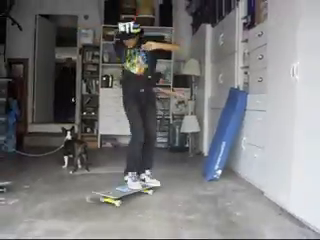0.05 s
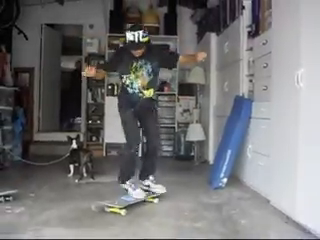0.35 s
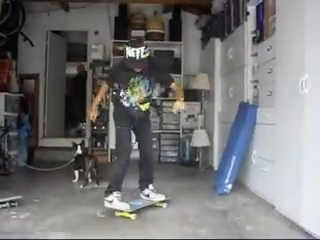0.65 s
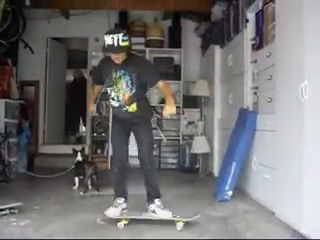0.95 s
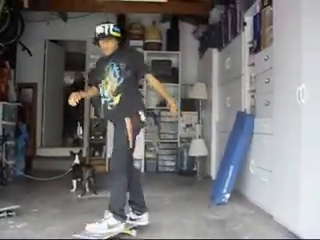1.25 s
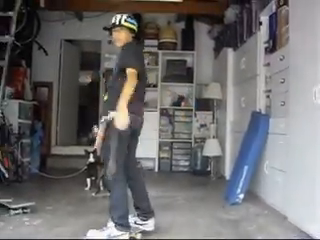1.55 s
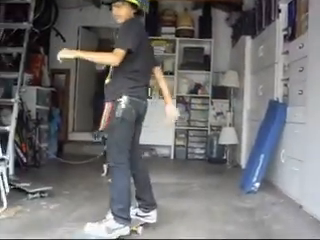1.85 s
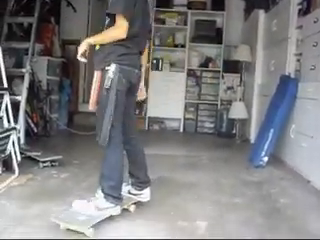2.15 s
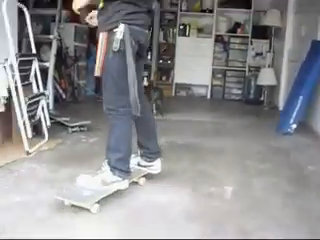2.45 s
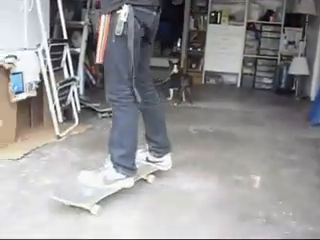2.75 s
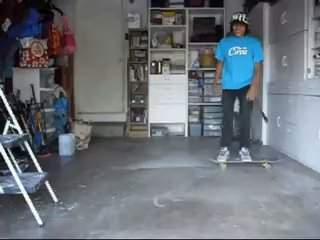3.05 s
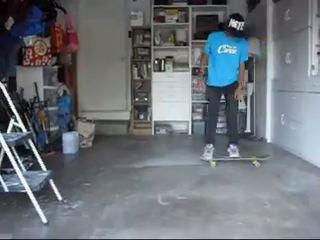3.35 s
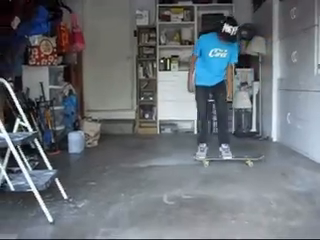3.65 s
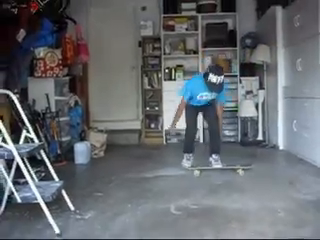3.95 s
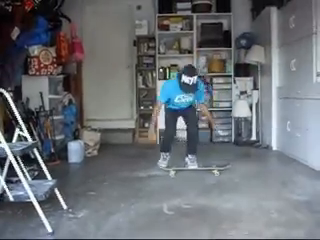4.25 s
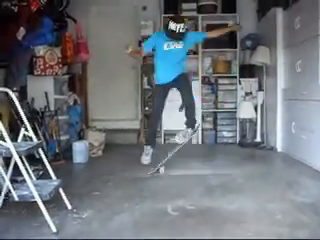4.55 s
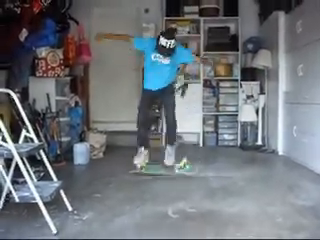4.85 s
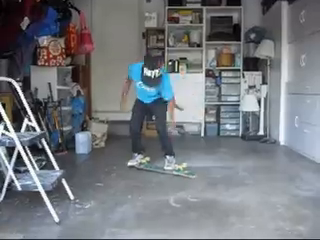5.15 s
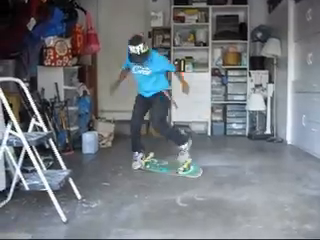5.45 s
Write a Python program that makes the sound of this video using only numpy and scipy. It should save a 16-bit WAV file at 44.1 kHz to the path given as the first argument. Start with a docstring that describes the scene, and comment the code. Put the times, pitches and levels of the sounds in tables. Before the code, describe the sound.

A skateboard lands on a concrete garage floor with a sharp wooden clack, then knocks lightly and rolls over a low rumble. After a brief dead silence, a second board rolls with wheel knocks and shoe scuffs. Its tail snaps and it slams down, overloading the microphone. A rubber sole squeaks as it rolls on, with faint bearing sizzle and metallic tinkles.

```python
"""A skateboard does a flip trick on a concrete garage floor; after a short silence, a second one does.
The tail snaps, the wooden deck rings, is caught and slams down hard enough to overload the microphone.
Wheels roll, knock and crush grit, bearings sizzle and loose axle washers jingle.
Rubber soles scuff on grip tape and squeak as they stick and slip.
Underneath, a low rumble swells with wind, rolling and the air pushed by the landing."""
import sys
import numpy as np
from scipy import signal
from scipy.fft import rfft, irfft, next_fast_len
from scipy.io import wavfile
from scipy.ndimage import uniform_filter1d, map_coordinates

SR = 44100
rng = np.random.default_rng(int(sys.argv[2]) if len(sys.argv) > 2 else 0)


def log_audio(samples):
    """Write samples as a 16-bit WAV file to the path given in sys.argv[1]."""
    # one column per channel
    frames = np.atleast_2d(samples).T
    # limit to full scale, then quantise
    limited = np.clip(frames, -1, 1)
    pcm = np.round(limited * 32767).astype(np.int16)
    wavfile.write(sys.argv[1], SR, pcm)


N = 246959
TIME = np.arange(N) / SR
GAP_START_S, GAP_END_S = 2.745, 3.186  # silence between the two boards


def amp(db):
    """Decibels to gain."""
    return 10 ** (np.asarray(db) / 20)


def unit(x):
    """Scales to rms 1."""
    return x / np.sqrt(np.mean(x ** 2) + 1e-20)


def at_hz(points, hz):
    """Interpolates (frequency [Hz], value) points on a log-frequency axis."""
    f, value = np.transpose(points)
    return np.interp(np.log(hz + 1), np.log(f + 1), value)


def add(mix, start_s, sound):
    """Mixes a sound in at start_s."""
    part = mix[max(0, round(start_s * SR)):][:len(sound)]
    part += sound[:len(part)]


def coloured(x, spectrum):
    """Filters noise by a spectrum, to rms 1."""
    size = next_fast_len(len(x))
    gain = amp(at_hz(spectrum, np.fft.rfftfreq(size, 1 / SR)))
    return unit(irfft(rfft(x, size) * gain, size)[:len(x)])


def wander(per_s):
    """Smooth random curve, rms 1, about per_s changes a second."""
    knots = rng.standard_normal(8192)
    return unit(map_coordinates(knots, [TIME * per_s], order=2, mode="wrap"))


def minimum_phase(gain):
    """Impulse response with this gain that starts at once and rings out."""
    log_gain = np.log(np.maximum(gain, 1e-5))
    mirrored = np.concatenate([log_gain, log_gain[-2:0:-1]])
    return np.fft.ifft(np.exp(np.conj(signal.hilbert(mirrored)))).real


def strokes(rows, rise_s, fall_s):
    """Rise-hold-fall gain for rows of (start [s], length [s], level [dB])."""
    return sum(amp(db) * np.clip(np.minimum((TIME - s) / rise_s, (s + length - TIME) / fall_s), 0, 1)
               for s, length, db in rows)


def gritty(grains_per_s, spread_db):
    """Tiny contacts of random time and size."""
    size = amp(spread_db * np.minimum(rng.exponential(1, N), 5))
    return size * rng.standard_normal(N) * (rng.random(N) < grains_per_s / SR)


# Room decay: (frequency [Hz], t60 [s])
GARAGE_DECAY = [(100, 0.24), (300, 0.19), (550, 0.21), (850, 0.26), (1900, 0.26), (4800, 0.27),
                (9000, 0.26), (15000, 0.24)]
# Floor, wall and shelf reflections: (delay [s], gain [ratio])
REFLECTIONS = [(.0034, 0.15), (.0087, -0.11), (0.0145, 0.027)]


def garage(direct_gain=0.4, build_s=0.0016):
    """Room response from a new spot each call: direct sound, near reflections, dense tail."""
    hz, t, noise = signal.stft(rng.standard_normal(SR // 2), SR, nperseg=256)
    decay = amp(-60 * t / at_hz(GARAGE_DECAY, hz)[:, None])
    tail = signal.istft(noise * decay, SR, nperseg=256)[1]
    tail *= 1 - np.exp(-(np.arange(len(tail)) / SR / build_s) ** 2)
    response = tail / np.linalg.norm(tail)
    response[0] += direct_gain
    for delay_s, gain in REFLECTIONS:
        add(response, delay_s, np.array([gain]))
    return response / np.linalg.norm(response)


def in_garage(x):
    """Puts the room around a sound."""
    return signal.fftconvolve(x, garage())[:N]


# Struck body: (frequency [Hz], level [dB])
KNOCK_SPECTRUM = [(40, -25.5), (130, -18), (240, -7), (500, 0.5), (1000, -2.5), (2000, -2.5), (3500, -8),
                  (5500, -10.5), (8000, -19), (11000, -27.5), (16000, -34)]
# Contact tick: (frequency [Hz], level [dB])
TICK_SPECTRUM = [(1000, -6.5), (3000, -7), (4400, 1), (5800, -11), (7200, -6.5), (10500, -17), (16000, -26)]
# Deck bending under the rider: (frequency [Hz], level [dB], t60 [s])
FLEX_MODES = [(54.6, -15.5, 0.042), (104.2, 1, 0.068), (160.6, 4.5, 0.086), (221, 1, 0.15)]


def knock(modes, force_db, tilt_db_per_oct, thump_db, tick_db, tick_s=0.00069):
    """One impact: a hard contact tick, a low flex thump and the body ringing into the room."""
    hz, t = np.fft.rfftfreq(4096, 1 / SR), np.arange(4096) / SR
    peaks = sum(amp(db) ** 2 / (1 + (2 * (hz - f) / width) ** 2) for f, width, db in modes)
    tilt_db = tilt_db_per_oct * np.log2(np.clip(hz, 300, 9000) / 1500)
    body = amp(at_hz(KNOCK_SPECTRUM, hz) + tilt_db) * np.sqrt(1 + peaks)
    sound = amp(22.5) * signal.fftconvolve(garage(), minimum_phase(unit(body)))
    tick = coloured(rng.standard_normal(len(t)), TICK_SPECTRUM) * np.exp(-t / tick_s)
    thump = sum(amp(db - 60 * t / t60) * np.sin(2 * np.pi * f * rng.uniform(.9, 1.1) * t)
                for f, db, t60 in FLEX_MODES)
    add(sound, 0, amp(20.5 + tick_db) * tick / np.linalg.norm(tick))
    add(sound, 0, amp(23 + thump_db) * thump / np.linalg.norm(thump))
    return amp(force_db) * sound


# Board knocks: (time [s], force [dB], tilt [dB/oct], relative thump [dB], relative tick [dB])
BOARD_HITS = [ (0.000, 5.5, -1, -27, -19), (0.009, 0, 0.5, -30, -12), (0.027, -4, -7, -22, -26),
              (0.051, -15, -0.5, -24, -16), (0.261, -23, 1, -15.5, -16), (0.362, -27.5, -1.5, -20, -20),
              (0.383, -18, -1, -8.5, -35), (0.404, -11, -1.5, -26, -21), (0.421, -15.5, -2.5, -8, -14),
              (0.627, -28.5, -1, -26, -17), (4.402, -31.5, -1.5, 2, -23), (4.518, -34, -14, -8, -20),
              (4.5359, -2.5, 0.5, -18, -11.5), (4.539, -0.5, 0, -17.5, -10.5), (4.834, -10, -1, -11, -19),
              (4.8752, 10, -3, -7.5, -10), (4.887, 12, -4, -12, -14.5), (4.905, 6, -2, 2, -3),
              (4.920, 9.5, -2, -6.5, -4), (4.936, 3.5, 0.5, -6, -7), (5.439, -29, -2.5, -11, -24),
              (5.581, -28, -5, -22, -13)]
# Resonances of each board: (frequency [Hz], width [Hz], peak re knock spectrum [dB])
FIRST_BOARD_MODES = [(257, 54, 5), (356, 84, 3.5), (531.4, 50, 4.5), (807, 19, 4.5), (1007, 110, 4),
                     (1370, 350, 4), (1660, 130, 5.5), (3405, 450, -2.5)]
SECOND_BOARD_MODES = [(260, 71, 2), (358, 200, 1.5), (558, 70, 3.5), (850, 110, 3), (1080, 45, 4.5),
                      (1600, 54, 3), (2070, 540, 4.5), (3350, 1100, 6.5)]


def board_knocks():
    """Knocks ring the board: deck pops, catches, landings and a few wheel slaps."""
    out = np.zeros(N)
    for s, *hit in BOARD_HITS:
        add(out, s, knock(FIRST_BOARD_MODES if s < GAP_START_S else SECOND_BOARD_MODES, *hit))
    return out


# Wheels on concrete, second board's drone, grind under a lean: (frequency [Hz], level [dB])
ROLL_SPECTRUM = [(60, -2.5), (150, 6.5), (250, -0.5), (500, -5), (1000, -11), (1700, -15), (3000, -24),
                 (6000, -28.5), (15000, -48.5)]
DRONE_SPECTRUM = [(60, -29), (95, -2.5), (125, 2), (170, -7.5), (260, -12), (600, -44.5)]
GRIND_SPECTRUM = [(100, -4), (300, -16.5), (750, 6), (1500, -3.5), (3000, -16), (8000, -37)]
# Rider leaning into the wheels: (start [s], length [s], level [dB])
RIDER_LEANS = [(0.90, 0.29, -45.5), (4.28, 0.26, -49), (5.0, 0.69, -45)]


def rolling(first_db=-44.5, second_db=-42, drone_db=-42.5, uneven_db=-0.83):
    """Wheels run over the grain and uneven patches of the floor and grind brighter under a lean."""
    second_board = TIME > GAP_START_S
    roll_gain = amp(np.where(second_board, second_db, first_db))
    roll = coloured(gritty(grains_per_s=2400, spread_db=-0.5), ROLL_SPECTRUM) * roll_gain
    drone = coloured(rng.standard_normal(N), DRONE_SPECTRUM) * amp(drone_db) * second_board
    lean = strokes(RIDER_LEANS, rise_s=0.13, fall_s=0.3)
    grind = coloured(gritty(grains_per_s=2400, spread_db=1.0), GRIND_SPECTRUM) * lean
    return (roll + drone + grind) * amp(uneven_db * wander(32))


# Low rumble and background hiss: (frequency [Hz], level [dB])
RUMBLE_SPECTRUM = [(8, -8), (20, 2), (35, 1.5), (60, -4), (110, -9), (170, -25.5), (300, -26), (1000, -65)]
HISS_SPECTRUM = [(200, 13.5), (2000, 6), (6000, -7.5), (15000, -5)]
# Swells of low rumble from wind, rolling and the landing: (start [s], length [s], level [dB])
RUMBLE_SWELLS = [(0.95, 0.11, -43), (1.88, 0.87, -35), (3.12, 0.28, -32.5), (3.65, 0.13, -27.5),
                 (4.85, 0.23, -25)]


def rumble_and_hiss(rumble_db=-35, lumpy_db=2.0, hiss_db=-52.5):
    """A lumpy low rumble swells with wind, rolling and the landing's air push, over a steady hiss."""
    swells = strokes(RUMBLE_SWELLS, rise_s=0.044, fall_s=0.052)
    strength = np.hypot(amp(rumble_db), swells) * amp(lumpy_db * wander(12))
    rumble = coloured(rng.standard_normal(N), RUMBLE_SPECTRUM) * strength
    hiss = coloured(rng.standard_normal(N), HISS_SPECTRUM) * amp(hiss_db)
    return rumble + hiss


# Sole on grip tape: (frequency [Hz], level [dB])
SCUFF_SPECTRUM = [(300, -10), (1000, 1), (2000, 2), (3000, 2), (4300, -0.5), (5500, -9.5), (7500, -19),
                  (15000, -45)]
# Foot shifts: (start [s], length [s], level [dB], tilt [dB/oct])
SOLE_SCUFFS = [(0.15, 0.15, -40.5, 0), (0.45, 0.13, -45.5, 14), (1.358, 0.17, -45.5, -2),
               (2.445, 0.24, -53, -6), (3.315, 0.065, -43, -3), (3.564, 0.18, -49, 0.5),
               (3.865, 0.06, -40, -2.5), (3.906, 0.074, -41, 1), (4.005, 0.07, -42.5, 1.5),
               (4.176, 0.24, -44, 1), (4.49, 0.09, -41.5, 2), (4.757, 0.06, -35.5, 9.5),
               (5.115, 0.67, -47.5, -0.5)]


def scuffs(uneven_db=2.2):
    """Soles drag over grip tape grain by grain, each stroke with its own brightness."""
    out = np.zeros(N)
    grains = gritty(grains_per_s=1100, spread_db=5.0) * amp(uneven_db * wander(40))
    for s, length, db, tilt in SOLE_SCUFFS:
        span = (TIME >= s) & (TIME < s + length)
        spectrum = [(hz, band_db + tilt * np.log2(hz)) for hz, band_db in SCUFF_SPECTRUM]
        envelope = strokes([(s, length, db)], rise_s=0.0084, fall_s=0.059)[span]
        add(out, s, coloured(grains[span], spectrum) * envelope)
    return out


# Washer modes: (frequency [Hz])
WASHER_MODES_HZ = [6064, 7330, 9680, 10080, 11186, 12780, 13890]
# Strength of each mode: (level [dB])
WASHER_MODES_DB = [-4, -1.5, -1, 0, -1.5, -7, -1]
# Clear tinkles: (time [s], level [dB], favoured mode [Hz])
CLEAR_TINKLES = [(0.169, -57, 10080), (0.465, -55, 10080), (0.895, -58, 9680), (1.088, -65, 13890),
                 (1.133, -56, 13890), (1.681, -58, 10080), (1.735, -67, 13890), (4.639, -48, 13890),
                 (4.663, -43, 7330), (4.778, -43.5, 13890), (5.055, -45, 13890), (5.075, -52, 9680),
                 (5.355, -51, 10080)]
# Faint random tinkles while the board rocks: (start [s], length [s], level [dB])
JIGGLE_SPANS = [(0.526, 0.27, -66.5), (0.937, 0.24, -63.5), (3.871, 0.16, -64)]


def washers(rattle_s=0.0069, spread_db=3, width_hz=150, favour_db=6, jiggles_per_s=23):
    """Loose steel rings chatter on their axles; each tinkle favours one mode."""
    out, t, mode_hz = np.zeros(N), np.arange(4096) / SR, np.array(WASHER_MODES_HZ)
    modes = np.sin(2 * np.pi * mode_hz[:, None] * t) * t * np.exp(-np.pi * width_hz * t)
    faint = [(s + rng.random() / jiggles_per_s, db, rng.choice(mode_hz))
             for start, length, db in JIGGLE_SPANS
             for s in np.arange(start, start + length, 1 / jiggles_per_s)]
    for s, db, favoured_hz in CLEAR_TINKLES + faint:
        chatter = rng.standard_normal(len(t)) * t * np.exp(-t / rattle_s)
        mode_db = WASHER_MODES_DB + spread_db * rng.standard_normal(len(mode_hz))
        mode_db[np.argmin(abs(mode_hz - favoured_hz))] += favour_db
        ring = signal.fftconvolve(chatter, amp(mode_db) @ modes)[:len(t)]
        add(out, s, amp(db) * unit(ring))
    return out


# Bearing sizzle: (frequency [Hz], level [dB])
BEARING_SPECTRUM = [(500, -24), (2000, 3), (5000, 2.5), (10000, -0.5), (15000, -11)]
# Jolts that spin the bearings: (time [s], level [dB], decay [dB/s])
BEARING_SPINS = [(0.45, -56.5, 2), (4.559, -48.5, 0.5)]


def bearings(spin_up_s=0.04):
    """Steel balls sizzle in their races, fading slowly as they run down."""
    spin = sum(np.clip((TIME - s) / spin_up_s, 0, 1) * amp(db - decay * np.maximum(TIME - s, 0))
               for s, db, decay in BEARING_SPINS)
    return coloured(gritty(grains_per_s=11000, spread_db=1.5), BEARING_SPECTRUM) * spin


# Sole slips: (start [s], length [s], pitch [Hz], onset offset [Hz], level [dB], half-harmonics [dB])
SOLE_SLIPS = [(0.554, 0.1, 1700, -32, -42.5, -9), (3.313, 0.032, 3830, 0, -50, -12),
              (3.573, 0.036, 2930, -500, -46.5, -14), (5.294, 0.1, 2656, 103, -29, -29),
              (5.325, 0.027, 2291, 398, -20.5, -22.5)]
# Harmonics 1-3 at the firmest pressure: (level [dB])
SQUEAK_HARMONICS_DB = [2, -5.5, -16.5]


def squeaks(jitter=0.03, flutter_db=5.5, firm_db=-27, settle_s=0.00506, dulling_db_per_db=0.3):
    """Rubber sticks and slips on the deck: raspier and duller when light, half-harmonics when uneven."""
    out, firmest_db = np.zeros(N), max(row[4] for row in SOLE_SLIPS)
    for s, length, hz, offset_hz, db, halves_db in SOLE_SLIPS:
        t = np.arange(0, length, 1 / SR)
        rasp = jitter * amp(np.clip(firm_db - db, 0, 20) / 2)
        pitch_hz = (hz + offset_hz * np.exp(-t / settle_s)) * (1 + rasp * wander(1219)[:len(t)])
        phase = 2 * np.pi * np.cumsum(pitch_hz) / SR
        step_db = dulling_db_per_db * (db - firmest_db)
        tone = sum(amp(harmonic_db + k * step_db) * np.sin((k + 1) * phase)
                   for k, harmonic_db in enumerate(SQUEAK_HARMONICS_DB))
        tone = unit(tone * (1 + 2 * amp(halves_db) * np.cos(phase / 2)))
        pressure = np.sin(np.pi * (t / length) ** 0.87)  # one arch, peaking early
        add(out, s, tone * pressure * amp(db + flutter_db * wander(359)[:len(t)]))
    return out


# Wheel impacts: (time [s], force [dB], tilt [dB/oct], relative thump [dB], relative tick [dB])
WHEEL_HITS = [ (0.830, -41.5, 10, -20, -2), (0.853, -50, 19, -20, 0), (0.899, -42.5, -2.5, -18, -2),
              (1.082, -49, 4, -20, 0), (1.224, -44, 10, -20, 3), (1.3007, -15.5, -3, -12, -6),
              (1.31, -17.5, -3, -32, -19), (1.328, -28.5, 2, -14, -26), (1.3905, -32.5, -2.5, -20, -4.5),
              (1.709, -41.5, 4, -10, -0.5), (3.471, -27.5, 1.5, -24, -18), (3.481, -19.5, 1, -11, -10),
              (3.78, -21, 0, -13, -17), (4.135, -31.5, -1.5, -14, -12)]
# Wheel on its truck, each board: (frequency [Hz], width [Hz], peak re knock spectrum [dB])
FIRST_WHEEL_MODES = [(550, 25, 13.5), (1200, 34, 1), (1620, 71, 11), (1870, 90, 10.5), (2315, 80, 12),
                     (2490, 110, 9.5), (4500, 540, -14)]
SECOND_WHEEL_MODES = [(478, 22, 9.9), (1575, 110, 9), (1980, 70, 7), (2320, 110, 10), (3300, 160, 3),
                      (3850, 230, 4.2)]


def wheel_knocks():
    """Wheels drop on the floor and trucks click."""
    out = np.zeros(N)
    for s, *hit in WHEEL_HITS:
        add(out, s, knock(FIRST_WHEEL_MODES if s < GAP_START_S else SECOND_WHEEL_MODES, *hit))
    return out


# Wheel on loose grit: (start [s], length [s], level [dB])
GRIT_SPANS = [(2.48, 0.19, -49)]
# Cracking grit: (frequency [Hz], level [dB])
GRIT_SPECTRUM = [(500, -27), (1200, -3.5), (2000, 2), (3400, -7), (4800, -13), (8000, -26)]


def grit_crunch(cracks_per_s=170, crack_s=0.0024):
    """Grains crack one by one under a wheel, each a tiny noise burst."""
    cracks = 1.0 * (rng.random(N) < cracks_per_s / SR)
    bursts = signal.lfilter([1], [1, -np.exp(-1 / (crack_s * SR))], cracks)
    envelope = strokes(GRIT_SPANS, rise_s=0.012, fall_s=0.012)
    return coloured(bursts * rng.standard_normal(N), GRIT_SPECTRUM) * envelope


def scene():
    """Boards, shoes and background in the garage, mono."""
    mix = board_knocks() + wheel_knocks() + rolling() + bearings() + rumble_and_hiss() + grit_crunch()
    return (mix + in_garage(scuffs()) + in_garage(squeaks()) + in_garage(washers()))[None]


def record(dry, ceiling=0.99, cutoff_hz=15700):
    """The microphone overloads on the hardest hits; the gap is muted; a low-pass limits the band."""
    clipped = np.clip(dry, -ceiling, ceiling)
    audible = (TIME < GAP_START_S) | (TIME > GAP_END_S)
    gate = uniform_filter1d(audible * 1., size=64)
    low_pass = signal.firwin(511, cutoff_hz, window=("kaiser", 9), fs=SR)
    return signal.oaconvolve(clipped * gate, low_pass[None], "same", axes=1)


dry = scene()
out = record(dry)
log_audio(out)
```